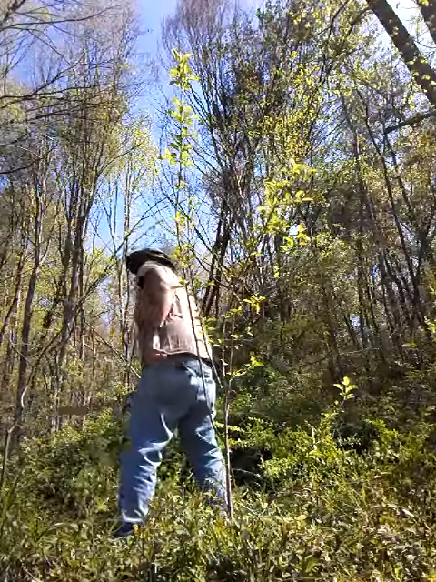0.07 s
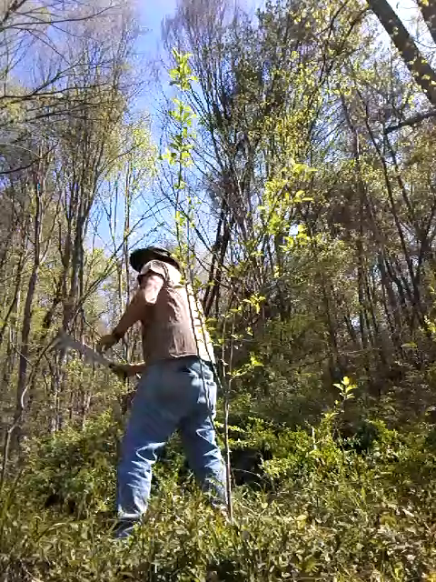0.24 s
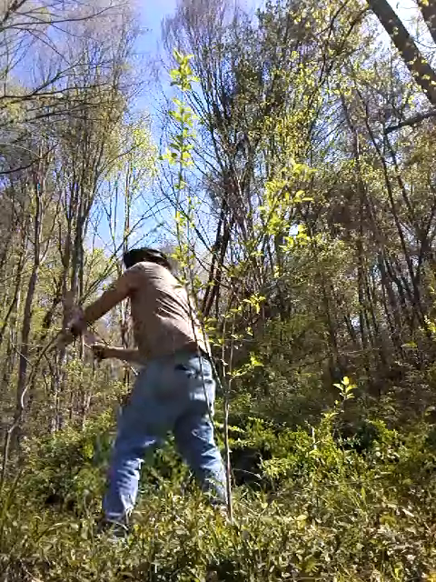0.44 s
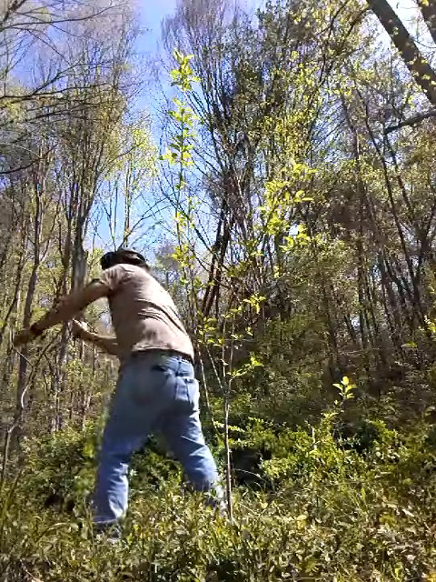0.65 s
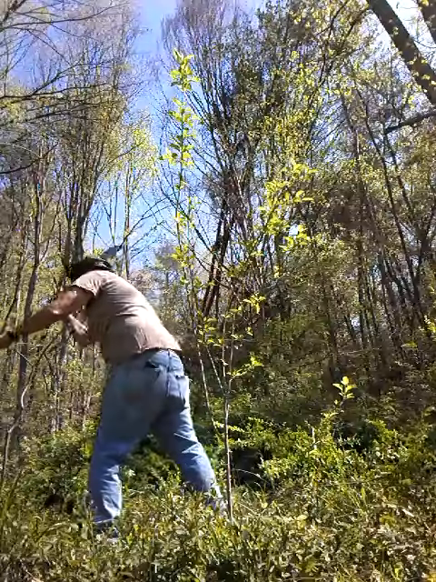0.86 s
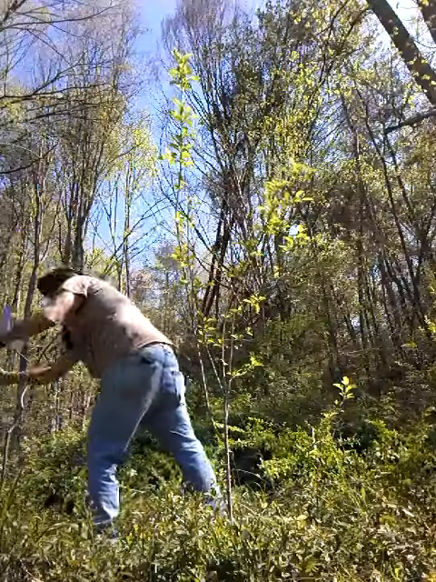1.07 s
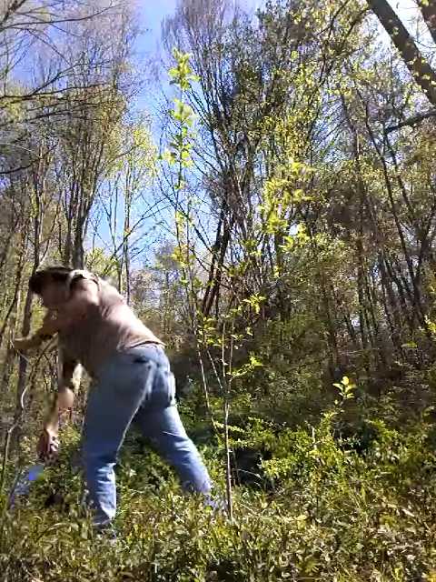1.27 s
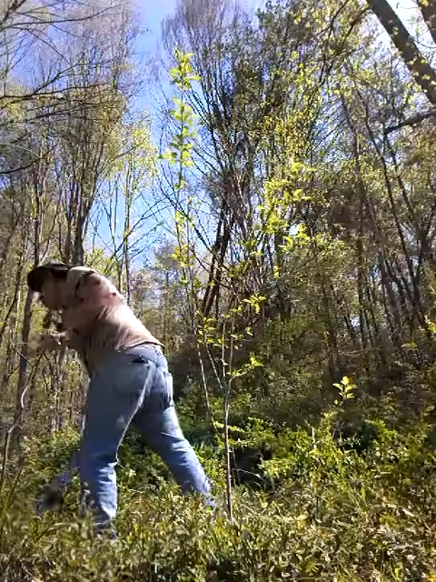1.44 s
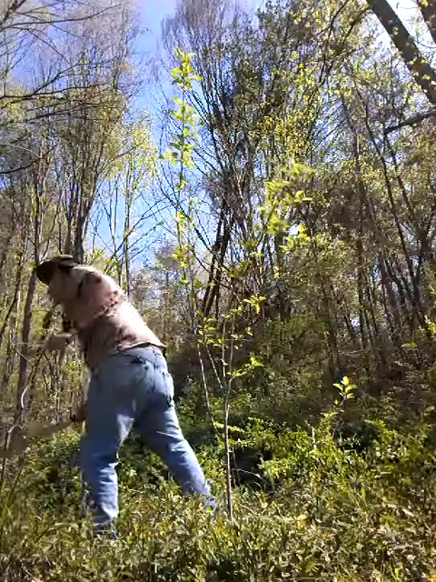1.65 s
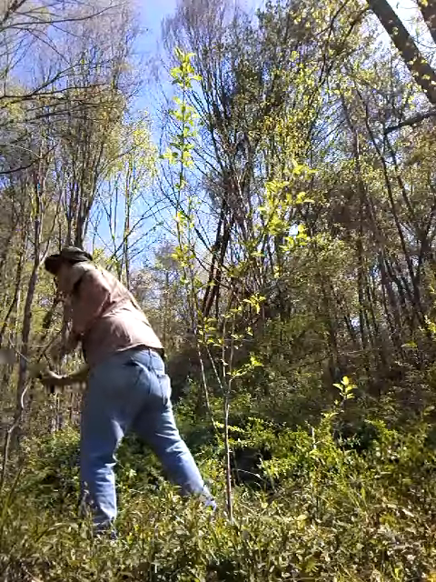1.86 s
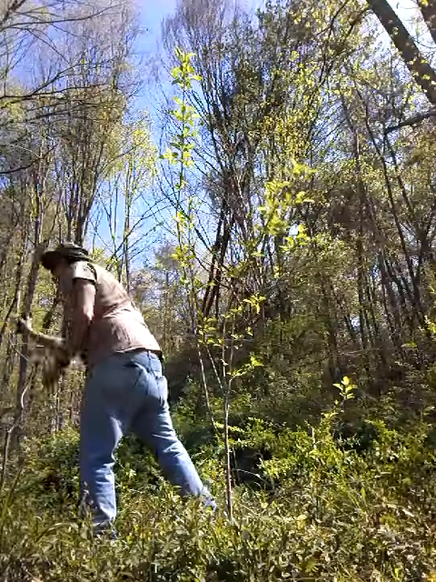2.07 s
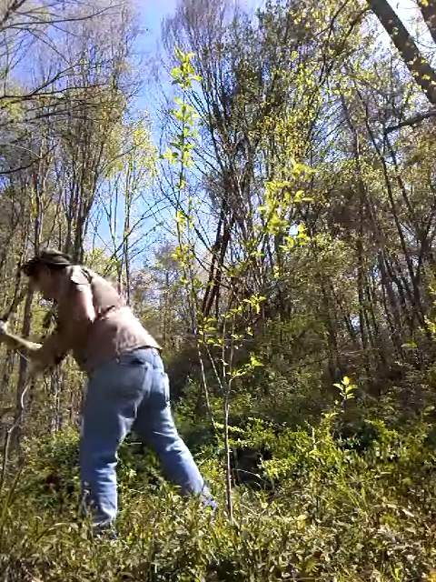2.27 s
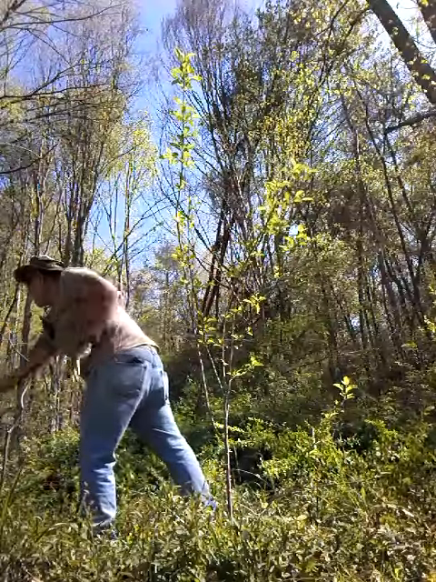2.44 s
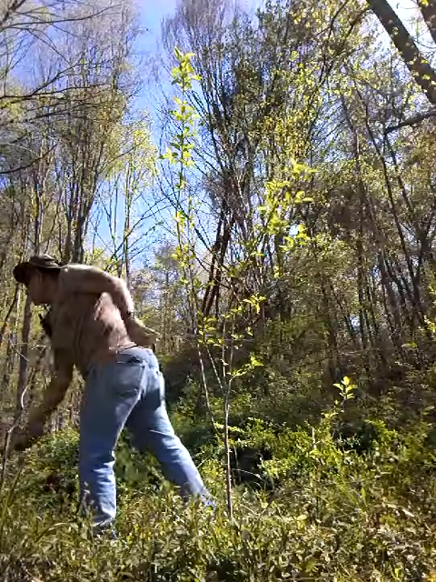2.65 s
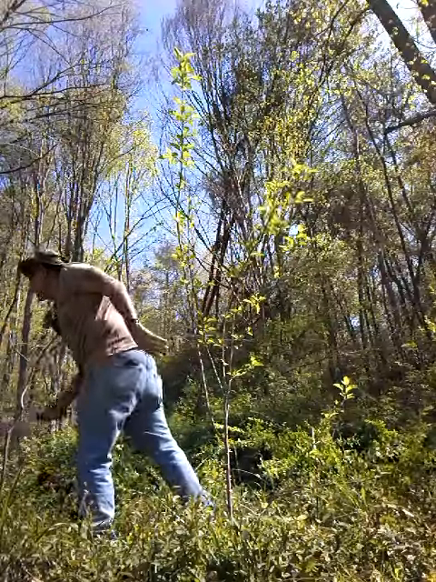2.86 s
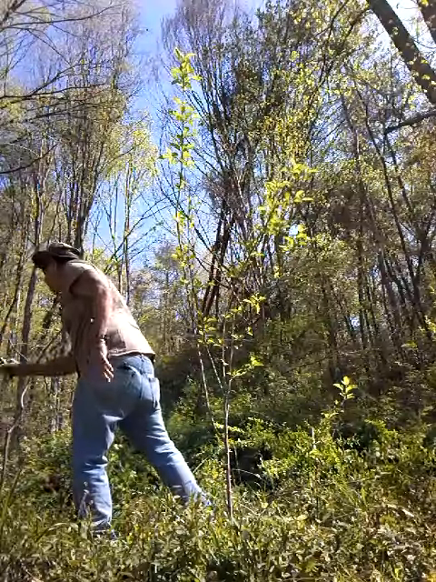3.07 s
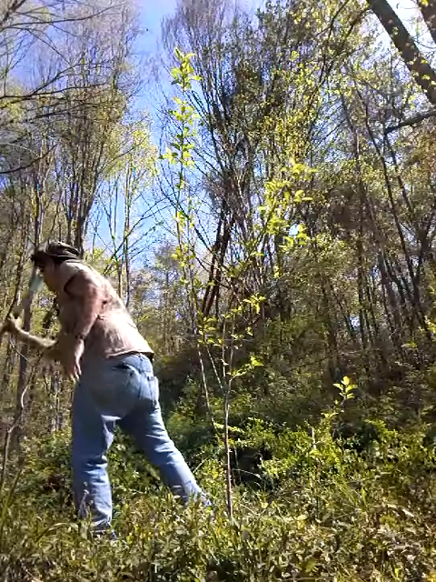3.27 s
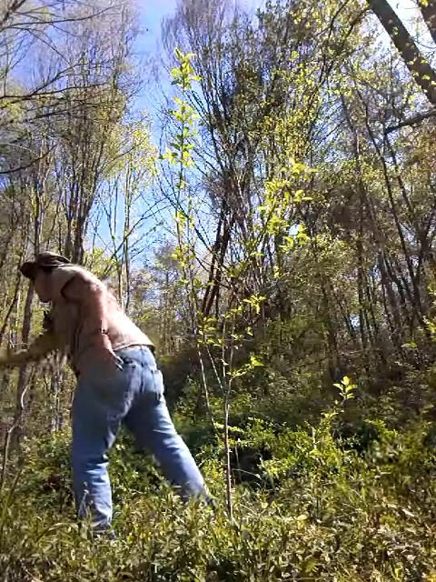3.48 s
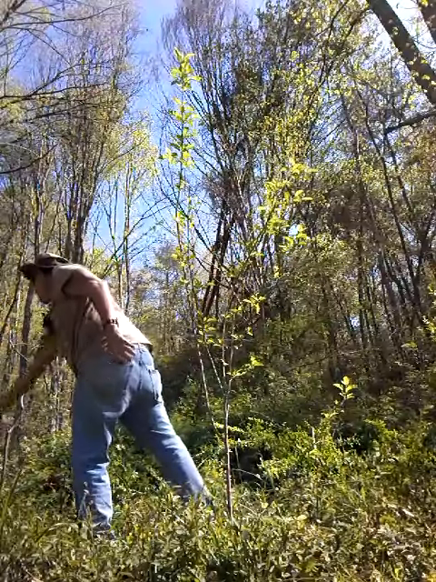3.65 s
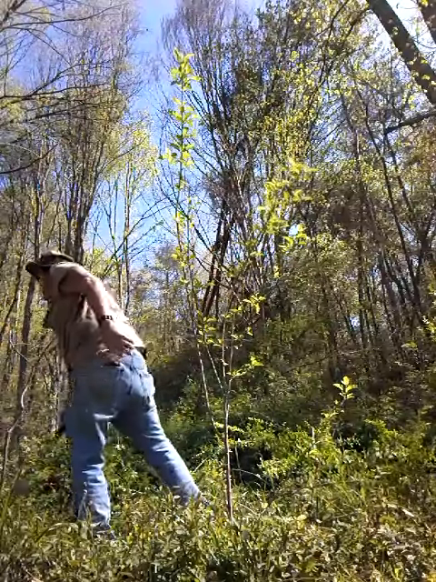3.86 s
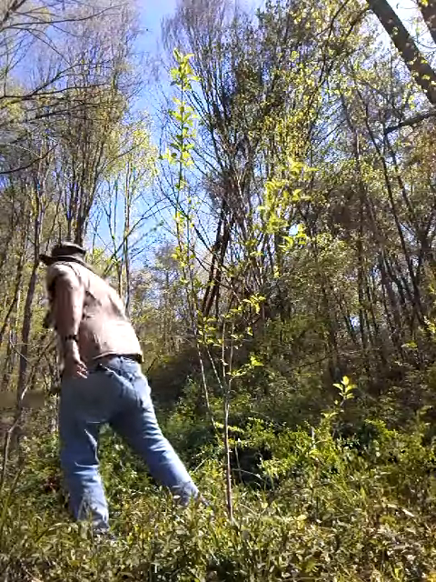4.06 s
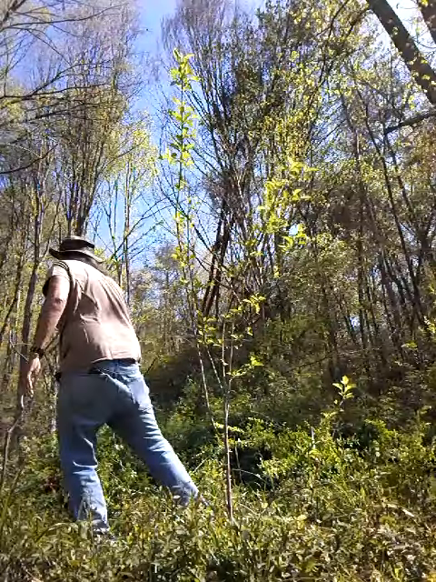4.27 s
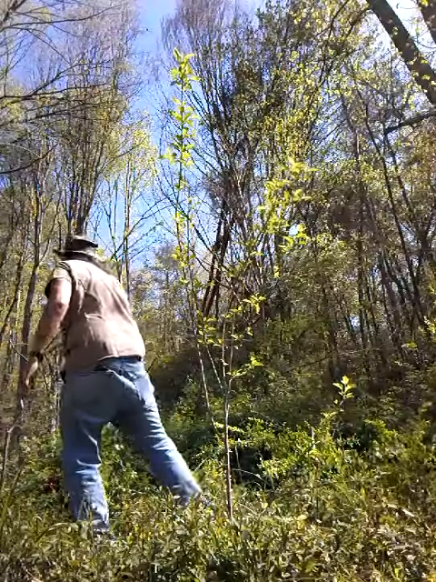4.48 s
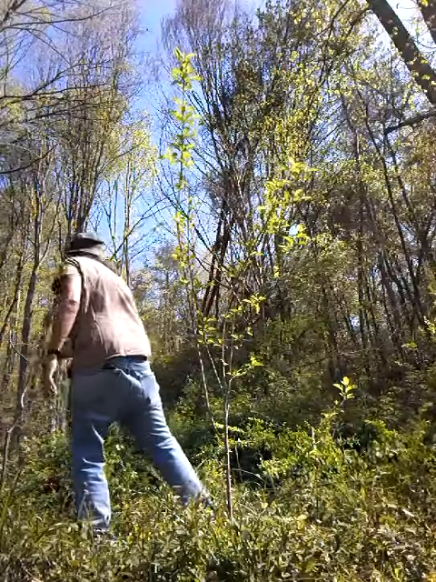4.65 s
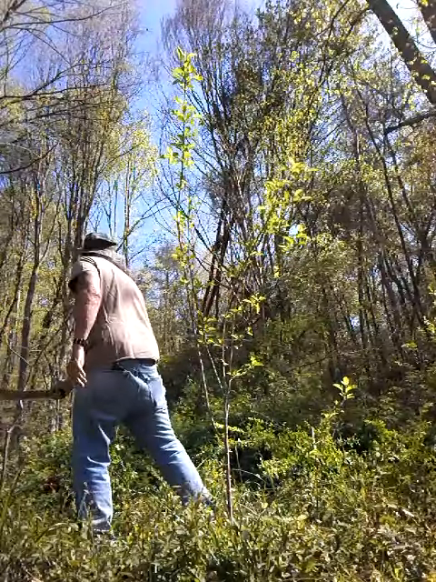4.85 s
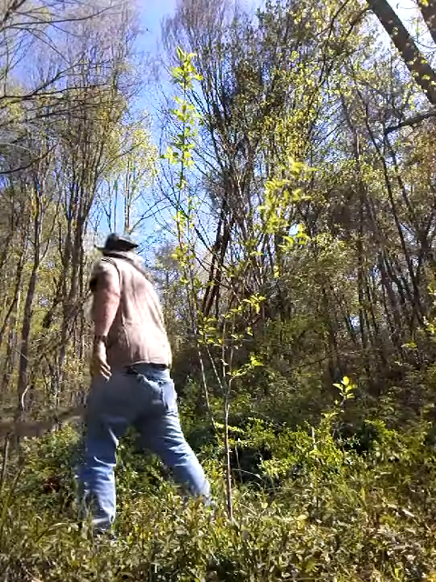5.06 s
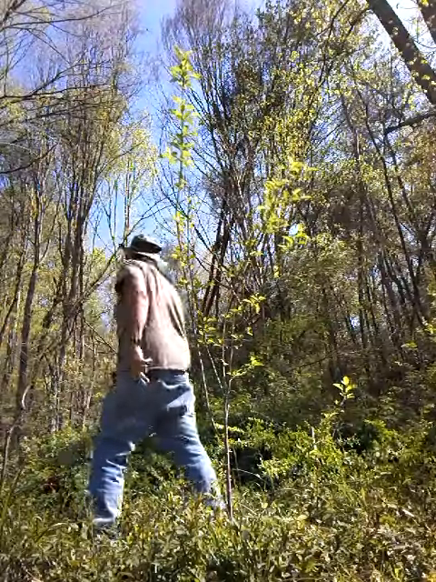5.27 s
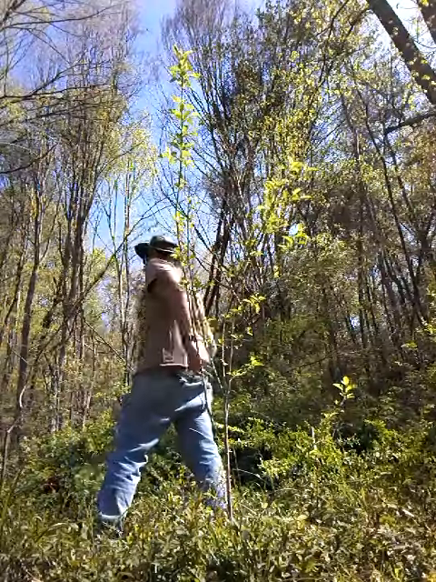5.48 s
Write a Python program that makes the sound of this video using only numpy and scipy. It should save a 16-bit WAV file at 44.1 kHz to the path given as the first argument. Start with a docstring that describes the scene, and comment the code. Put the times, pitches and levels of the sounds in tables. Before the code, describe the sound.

Sharp blade cuts crack through thin stems outdoors, metal rings thinly, leaves rustle, twigs snap and a faint bird sings behind.

```python
"""A machete chops brush and saplings in the woods.
Each cut is filtered noise in three bands, like breaking fibres, over the decaying sines of a knocked stem.
The steel rings on as a bank of modes, its pitch bent by the swing.
Leaves and stalks rustle as filtered crackle, twigs snap, dry sticks knock and boots press the soil.
A far bird repeats a gliding phrase, a farther one whistles, air rumbles and hisses, a camera whines thinly."""
import sys
import numpy as np
from scipy import signal
from scipy.fft import rfft, irfft
from scipy.io import wavfile
from scipy.ndimage import uniform_filter1d

SR = 44100
rng = np.random.default_rng(int(sys.argv[2]) if len(sys.argv) > 2 else 0)


def unload_audio(sound):
    """Save the sound as a 16-bit wav file, at the path given as the first command line argument."""
    columns = np.transpose(np.atleast_2d(sound))
    # keep every value between -1 and 1, then stretch to whole-number steps
    steps = np.round(np.clip(columns, -1, 1) * 32767)
    wavfile.write(sys.argv[1], SR, steps.astype(np.int16))


N = 243419
TIME = np.arange(N) / SR  # s

# Outdoor air spectrum. Each row: frequency in Hz, relative level in dB.
AIR_SPECTRUM = [(18, -62), (30, -42), (55, -7.5), (87, 0.5), (149, -3.5), (173, -7.5), (311, -12),
                (421, -13), (466, -13), (1390, -21.5), (3300, -25.5), (4710, -31.5), (6070, -26),
                (8020, -33.5), (13000, -34)]
AIR_DB = -57

# The bird's phrase. Each row: start within the phrase in seconds, length in seconds,
# first, middle and last pitch in Hz, level in dB relative to the song.
BIRD_PHRASE = [(0, 0.038, 2780, 2890, 3140, 1), (0.033, 0.043, 3330, 3310, 3730, 6.5),
               (0.097, 0.07, 5200, 5260, 5320, -3.5), (0.16, .04, 4680, 4300, 3800, -1),
               (0.225, .055, 3430, 2990, 2700, 2)]
SONG_START_S, SONG_PERIOD_S, SONG_DB = 3.005, 0.436, -66
# A farther bird. Each row: start in seconds, length in seconds, first, middle and last pitch in Hz, level in dB.
FAR_WHISTLES = [(4.566, 0.29, 2700, 2630, 2600, -71.5), (4.94, 0.22, 2600, 2550, 2576, -69)]

# Boots on soft ground. Each row: start in seconds, length in seconds, level in dB before the swell shape.
BOOT_STEPS = [(5.34, 0.034, -54), (5.452, 0.094, -48.5)]

# Twigs snapping. Each row: start in seconds, level in dB.
TWIG_SNAPS = [(0.688, -47.5), (1.0988, -40.5), (1.107, -41), (1.129, -47), (1.3336, -36), (1.36, -39.5),
              (1.515, -49), (1.589, -51), (1.708, -55.5), (1.971, -56), (2.082, -55.5), (2.09, -55.5),
              (2.160, -48), (2.271, -57), (2.4797, -53), (2.597, -47.5), (2.7402, -49), (2.9076, -59),
              (3.753, -50.5), (4.0028, -55.5), (4.6383, -45.5), (4.8042, -38.5), (4.846, -42.5),
              (4.9634, -46.5), (5.066, -45.5)]
# Colour of a snapping twig. Each row: frequency in Hz, relative level in dB.
TWIG_COLOUR = [(150, -31), (500, -11), (2000, -18), (3800, -14.5), (5000, -3), (6400, 6.5), (7600, -5),
               (9000, -12), (14000, -18), (16000, -22.5)]
TIP_DB, TIP_SPREAD_DB = -56.5, 3.5  # loudest twig tip; most it loses to lateness, and again to chance
# Hollow wooden knocks: dry sticks knocking together, and at 2.64 s a faint cut of the blade. Each row: start in
# seconds, level in dB, pitch as a factor on the stick's.
WOOD_KNOCKS = [(0.9037, -46, 1.07), (2.6442, -54.5, 2.14), (5.3579, -49.5, 0.46)]
# Colour of a knocking stick at factor 1. Each row: frequency in Hz, relative level in dB.
STICK_COLOUR = [(120, -25), (300, -1), (700, -10.5), (1200, 6), (1800, -7.5), (2400, -25), (4000, -26),
                (6400, -21), (10000, -37)]

# Brush pushed aside and springing back. Each row: peak time in seconds, swell in seconds,
# settling in seconds, peak level of the leaves in dB, peak level of the stalks in dB.
BRUSH_PUSHES = [(.515, .15, .15, -48, -51), (.71, 0.35, 0.29, -56.5, -56.5), (1.08, .015, 0.86, -50.5, -64),
                (1.279, 0.051, 0.18, -36.5, -48.5), (1.511, 0.53, 0.32, -51, -54),
                (2.56, 0.014, .6, -51.5, -62.5), (2.725, 0.063, 0.23, -50, -55),
                (3.68, .015, 0.44, -50.5, -60), (4.611, .12, .4, -62.5, -74),
                (4.82, 0.013, 0.088, -53, -59.5), (5.14, 0.11, 0.6, -63.5, -67),
                (5.5, 0.62, .3, -64.5, -63)]
RUSTLE_RANGE_DB = 22  # change over one swell or settling time
# Colour of the leaves. Each row: frequency in Hz, relative level in dB.
LEAF_COLOUR = [(1200, -40.5), (2500, -6.5), (4500, -6), (6300, 6.5), (7500, -7.5), (10000, -13.5),
               (15000, -14.5)]
# Colour of the stalks. Each row: frequency in Hz, relative level in dB.
STALK_COLOUR = [(120, -19.5), (300, 3), (600, 1), (1500, -3), (2400, -17.5), (4000, -32.5)]

# Blows that shake a stem. Each row: start in seconds, level in dB,
# ring time as a factor on the stem's, pitch as a factor on the stem's.
STEM_BLOWS = [(1.2228, -18.5, 0.11, 1.22), (2.531, -24, 0.62, 1.01), (3.665, -39.5, 1, .95),
              (4.807, -48, .9, 1.02)]
# Modes of the stem at factor 1. Each row: frequency in Hz, relative level in dB, 60 dB decay in seconds.
STEM_MODES = [(163, -9.5, 0.17), (211.4, -5.5, 0.25), (454, -26, 0.12), (568, -14, 0.09)]

# Modes of the steel. Each row: frequency in Hz at rest, relative level in dB, 60 dB decay in seconds.
STEEL_MODES = [(3475, -3, 1.9), (4144, -2.5, 1.12), (4747, -3, 0.74), (5300, -7, 0.22), (5805, -0.5, 0.61),
               (6282, 1.5, 0.49), (6370, -21, 0.82), (7070, -8, 0.25), (9000, -13, 0.53),
               (9900, -12.5, 0.35), (10600, -11, 0.57), (12200, -11, .3)]
# Wood touching the steel and waking the modes around one pitch. Each row: start in seconds,
# damped from in seconds, level in dB, centre in Hz, spread in Hz.
BLADE_TOUCHES = [(0.0, 0.18, -65.5, 3400, 700), (1.223, 1.321, -32, 5300, 2300),
                 (1.261, 1.33, -32.5, 3475, 300), (1.326, 1.372, -35, 5820, 380),
                 (1.394, 1.415, -42, 5200, 2800), (1.408, 1.445, -37, 5950, 400),
                 (1.498, 1.78, -49.5, 3475, 378), (1.534, 1.575, -44.5, 9900, 497),
                 (1.587, 1.92, -45.5, 6305, 99), (2.675, 2.992, -56.5, 3475, 500),
                 (2.714, 2.8, -60, 4730, 700), (2.686, 2.763, -49.5, 6300, 199.7),
                 (2.698, 2.786, -45.5, 10100, 1200), (2.789, 2.98, -44, 6330, 200),
                 (3.646, 3.662, -29.5, 5360, 900), (3.669, 3.686, -33.5, 5850, 246.7),
                 (3.677, 3.735, -43.5, 4730, 450), (3.733, 4.04, -47, 5570, 250),
                 (3.767, 4.11, -56, 4600, 1300), (4.655, 4.715, -58.5, 5870, 180)]
TOUCH_RISE_S, DAMPED_T60_S = 0.0018, 0.021  # for the briefest touch
RISE_SHARE, DAMPED_SHARE = 0.068, 0.98  # added per second of touch: a long one swells and fades slowly
# Strokes toward the microphone, then away. Each row: start in seconds, top speed in m/s,
# turning point in seconds after the start, time scale of the turn in seconds.
BLADE_STROKES = [(1.22, 4.8, 0.15, 0.073), (2.53, 3.3, 0.15, .08), (3.63, 4.5, .14, 0.266)]
SOUND_SPEED = 343  # m/s

# Blade breaking through wood. Each row: start in seconds, body level in dB, mid level in dB,
# crack level in dB, 60 dB decay of mid and crack in milliseconds.
BLADE_CUTS = [(1.0627, -42.5, -39.5, -25, 12.5), (1.0684, -52.5, -56, -34.5, 19),
              (1.221, -34.5, -31.5, -25.5, 17), (1.2225, -31, -39, -23.5, 19), (2.5292, -33, -38, -30, 28),
              (2.536, -55, -47.5, -36.5, 40), (3.636, -45, -43.5, -35, 21), (3.637, -40.5, -35, -29, 20),
              (3.6527, -43, -50, -46, 23), (3.6647, -40.5, -36, -32.5, 27), (3.6717, -38, -51, -50, 32),
              (4.804, -50, -53, -53, 32)]
BODY_DECAY_FACTOR = 1.74  # the dull body dies more slowly
# Colour of the dull body. Each row: frequency in Hz, relative level in dB.
BODY_COLOUR = [(30, -43), (70, -29), (120, -13.5), (190, -1.5), (310, -5), (460, 0.5), (680, -9),
               (1200, -34.5)]
# Colour of the woody middle. Each row: frequency in Hz, relative level in dB.
MID_COLOUR = [(450, -26.5), (750, -5), (1100, -6), (1700, -4), (2400, 6), (3000, -1), (3800, -54)]
# Colour of the bright crack. Each row: frequency in Hz, relative level in dB.
CRACK_COLOUR = [(2600, -37.5), (3200, -13.5), (4500, -10), (5500, -1.5), (6300, 3), (7400, -8),
                (10000, -13), (14000, -10), (16000, -19)]

WHINE_HZ, EDGE_HZ = 14322, 16300  # camera whine and upper band limit


def amp(db):
    """Decibels to gain."""
    return 10 ** (np.asarray(db) / 20)


def unit(x):
    """Scales to rms 1."""
    return x / np.sqrt(np.mean(x ** 2) + 1e-20)


def decay_60(t, t60):
    """Gain that falls by 60 dB every t60 seconds."""
    return np.exp(-np.log(1000) * t / t60)


def add(mix, s, sound):
    """Lays a sound into the mix at a time in seconds."""
    part = mix[max(round(s * SR), 0):][:len(sound)]
    part += sound[:len(part)]


def colour(x, points, size=4096):
    """Causal minimum-phase filter through the given (Hz, dB) points."""
    hz, db = np.transpose(points)
    bin_hz = abs(np.fft.fftfreq(size, 1 / SR)) + 1
    log_gain = np.log(amp(np.interp(np.log(bin_hz), np.log(hz), db)))
    response = np.exp(signal.hilbert(log_gain).conj())
    taps = np.fft.ifft(response).real[:size // 2]
    return signal.fftconvolve(x, taps)[:len(x)]


def drift(rate_hz):
    """Slow random wander of rms 1, with little movement faster than the rate."""
    spectrum = rfft(rng.standard_normal(N))
    smoothing = np.exp(-(np.fft.rfftfreq(N, 1 / SR) / rate_hz) ** 2)
    return unit(irfft(spectrum * smoothing, N))


def crackle(per_s, spread_db):
    """Sparse tiny breaks of very unequal size."""
    size = amp(spread_db * np.minimum(rng.exponential(1, N), 4))
    sign = rng.choice([-1, 1], N)
    breaks = rng.random(N) < per_s / SR
    return unit(size * sign * breaks)


def fracture(shape, t60_ms, rise, first_break, clump_db=4.0):
    """Fibres parting in quick clumps around one clean break; holds as much energy as 10 ms at rms 1."""
    t = np.arange(SR // 5) / SR
    clumps = unit(uniform_filter1d(rng.standard_normal(len(t)), size=24))
    burst = rng.standard_normal(len(t)) * amp(clump_db * clumps)
    burst *= decay_60(t, t60_ms / 1000)
    burst *= 1 - np.exp(-(t / rise) ** 2)
    burst /= np.linalg.norm(burst)
    burst[SR // 1000] += first_break  # the clean break, 1 ms in
    burst = colour(burst, shape)
    return burst / np.linalg.norm(burst) * np.sqrt(SR / 100)


def air():
    """Soft outdoor rumble and hiss, slightly swelling."""
    noise = unit(colour(rng.standard_normal(N), AIR_SPECTRUM))
    return amp(AIR_DB) * noise * amp(0.27 * drift(6.4))


def woods(x, t60=1.0, far_db=-21, near_t60=0.087, near_db=-14):
    """Ground and near stems scatter after 4 ms; far trunks return a thin, duller tail."""
    t = np.arange(SR) / SR
    near = crackle(2500, spread_db=3.5)[:SR] * decay_60(t, near_t60) * (t > 0.004)
    far = crackle(2000, spread_db=2.5)[:SR] * decay_60(t, t60) * (1 - np.exp(-t / 0.016))
    far_colour = [(150, 9.5), (500, 2.0), (1300, 3.5), (3000, 3.0), (6000, -8), (14000, -22)]
    far = colour(far / np.linalg.norm(far), far_colour)
    echoes = amp(near_db) * near / np.linalg.norm(near) + amp(far_db) * far
    return signal.fftconvolve(x, echoes)[:N]


def chirp(length, *hz):
    """A note gliding through three pitches, made unsteady by its path through the trees."""
    u = np.linspace(0, 1, round(length * SR))
    pitch = np.polyval(np.polyfit([0, 0.5, 1], hz, 2), u)
    waver = amp(2.5 * unit(uniform_filter1d(rng.standard_normal(len(u)), size=300)))
    return np.sin(2 * np.pi * np.cumsum(pitch) / SR) * np.sin(np.pi * u) * waver


def birds(count=4):
    """One bird repeats a five-note phrase at a steady pace; another holds faint whistles."""
    out = np.zeros(N)
    for start in SONG_START_S + SONG_PERIOD_S * np.arange(count):
        for s, *note, db in BIRD_PHRASE:
            add(out, start + s, amp(SONG_DB + db) * chirp(*note))
    for s, *note, db in FAR_WHISTLES:
        add(out, s, amp(db) * chirp(*note))
    return out


def steps():
    """A boot presses soft soil: a low swell of noise."""
    out = np.zeros(N)
    soil = [(50, -18), (95, -8), (170, 11), (260, -38.0), (600, -24), (1500, -55)]
    for s, length, db in BOOT_STEPS:
        press = unit(colour(rng.standard_normal(round(length * SR)), soil))
        add(out, s, amp(db) * press * np.hanning(len(press)))
    return out


def small_snaps(count=2):
    """Twig tips give way at chance moments while the brush settles, fainter when later."""
    snaps = []
    for s, _, settling, *_ in BRUSH_PUSHES:
        for late, small in rng.random((count, 2)):
            snaps.append((s + settling * late, TIP_DB - TIP_SPREAD_DB * (late + small)))
    return snaps


def twigs():
    """Thin dry twigs give short bright snaps; thicker sticks, and one faint blade cut, a hollow knock."""
    out = np.zeros(N)
    for s, db in list(TWIG_SNAPS) + small_snaps():
        add(out, s, amp(db) * fracture(TWIG_COLOUR, t60_ms=25, rise=0.00058, first_break=0.31))
    for s, db, pitch in WOOD_KNOCKS:
        stick = [(hz * pitch, band_db) for hz, band_db in STICK_COLOUR]
        add(out, s, amp(db) * fracture(stick, t60_ms=16, rise=0.0015, first_break=0.3))
    return out


def rustle(s, swell, settling):
    """Gain of one push on the brush: it swells to a peak and dies away."""
    return amp(-RUSTLE_RANGE_DB * np.maximum((s - TIME) / swell, (TIME - s) / settling))


def brush():
    """Dry leaves crackle and stalks scrape as the brush moves, over a constant faint crackle of litter."""
    leaves = unit(colour(crackle(3500, spread_db=3.5), LEAF_COLOUR))
    stalks = unit(colour(crackle(2500, spread_db=2), STALK_COLOUR))
    litter = amp(-72) * unit(colour(crackle(300, spread_db=4.0), TWIG_COLOUR))
    leaf_power, stalk_power = np.zeros((2, N))
    for s, swell, settling, leaves_db, stalks_db in BRUSH_PUSHES:
        push = rustle(s, swell, settling)
        leaf_power += (amp(leaves_db) * push) ** 2
        stalk_power += (amp(stalks_db) * push) ** 2
    return litter + np.sqrt(leaf_power) * leaves + np.sqrt(stalk_power) * stalks


def stems():
    """A struck sapling gives a short low knock; it is too thin to radiate deep bass."""
    out, t = np.zeros(N), np.arange(SR // 3) / SR
    for s, blow_db, ring, pitch in STEM_BLOWS:
        knock = np.zeros(len(t))
        for hz, db, t60 in STEM_MODES:
            knock += amp(db) * decay_60(t, t60 * ring) * np.sin(2 * np.pi * hz * pitch * t)
        add(out, s, amp(blow_db) * knock)
    return signal.sosfilt(signal.butter(2, 110, "high", fs=SR, output="sos"), out)


def ringing(gains, t60):
    """Envelope of one steel mode: every touch adds energy, which decays and is then damped."""
    power = np.zeros(N)
    t = np.arange(SR * 3 // 4) / SR
    for (s, damped_s, *_), gain in zip(BLADE_TOUCHES, gains):
        length = damped_s - s
        swell = np.minimum(t / (TOUCH_RISE_S + RISE_SHARE * length), 1)
        free = decay_60(t, t60)
        damped = decay_60(np.maximum(t - length, 0), DAMPED_T60_S + DAMPED_SHARE * length)
        add(power, s, (gain * swell * free * damped) ** 2)
    return np.sqrt(power)


def swing():
    """Speed of the blade toward the microphone in m/s; it is drawn back until the first stroke."""
    speed = np.full(N, -BLADE_STROKES[0][1])
    for s, top_speed, turns_after, turn_takes in BLADE_STROKES:
        stroke = -top_speed * np.tanh((TIME - s - turns_after) / turn_takes)
        speed = np.where(TIME < s, speed, stroke)
    return speed


def blade(flutter_db=1.74, turning_db=0.6):
    """Steel modes, Doppler-shifted by the swing; each flutters and fades on its own as the blade turns."""
    heard_time = np.cumsum(1 + swing() / SOUND_SPEED) / SR
    _, _, touch_db, centre, spread = np.transpose(BLADE_TOUCHES)
    out = np.zeros(N)
    for hz, db, t60 in STEEL_MODES:
        # a touch wakes a mode less the farther it lies from the touch's centre
        gains = amp(touch_db + db) / np.hypot(1, (hz - centre) / spread)
        tone = np.sin(2 * np.pi * hz * heard_time + 0.26 * drift(81.0))
        tone *= amp(flutter_db * drift(45) + turning_db * drift(11))
        out += ringing(gains, t60) * unit(tone)
    return out


def cuts():
    """Breaking fibres give each cut a dull body, a woody middle and a bright crack."""
    out = np.zeros(N)
    for s, body_db, mid_db, crack_db, t60_ms in BLADE_CUTS:
        body = fracture(BODY_COLOUR, t60_ms * BODY_DECAY_FACTOR, rise=0.0027, first_break=1.68)
        mid = fracture(MID_COLOUR, t60_ms, rise=0.00063, first_break=0.85)
        crack = fracture(CRACK_COLOUR, t60_ms, rise=0.00047, first_break=0.11)
        add(out, s, amp(body_db) * body + amp(mid_db) * mid + amp(crack_db) * crack)
    return out


def scene():
    """The chopping, brush, steps and birds with their echoes from the woods, over the air."""
    sources = birds() + steps() + twigs() + brush() + stems() + blade() + cuts()
    return (sources + woods(sources) + air())[None]


def record(dry, whine_db=-55.0):
    """The camera adds its steady high whine and limits the band."""
    whine = amp(whine_db) * unit(np.sin(2 * np.pi * WHINE_HZ * TIME + 0.22 * drift(7.2)))
    low_pass = signal.firwin(255, EDGE_HZ, window=("kaiser", 9), fs=SR)
    return signal.oaconvolve(dry + whine, low_pass[None], "same")


dry = scene()
out = record(dry)
unload_audio(out)
```